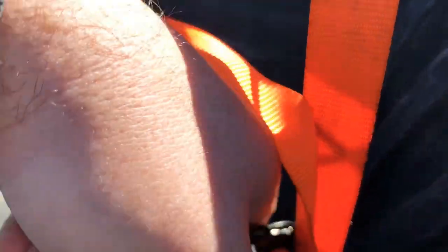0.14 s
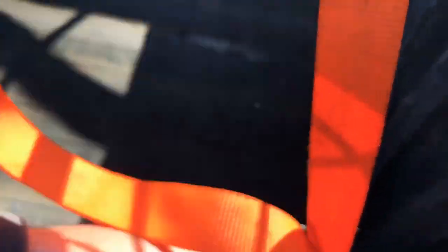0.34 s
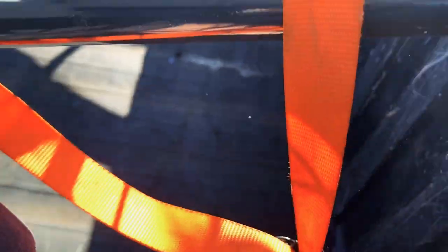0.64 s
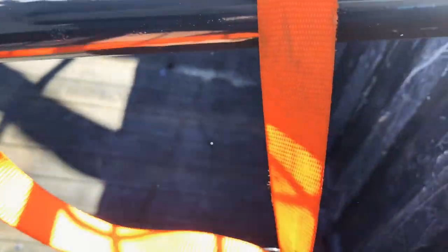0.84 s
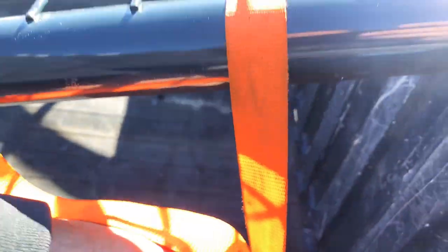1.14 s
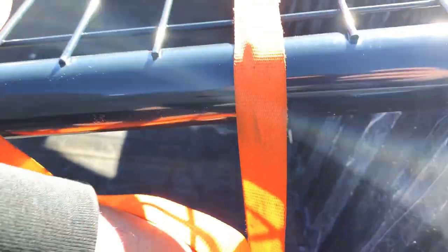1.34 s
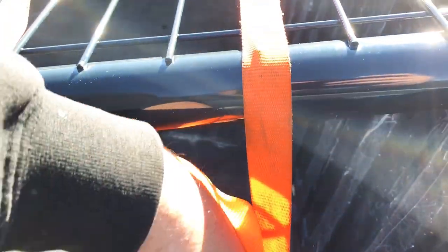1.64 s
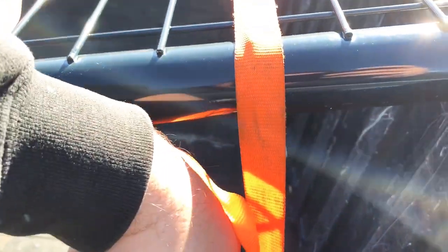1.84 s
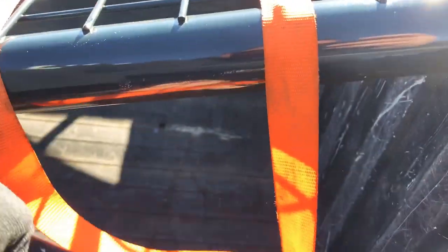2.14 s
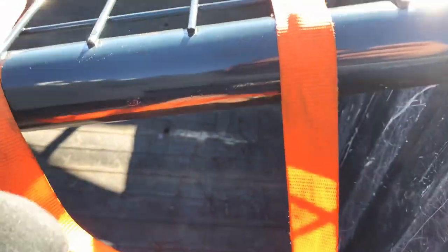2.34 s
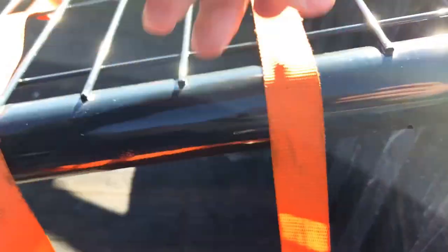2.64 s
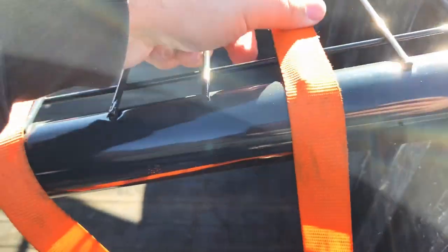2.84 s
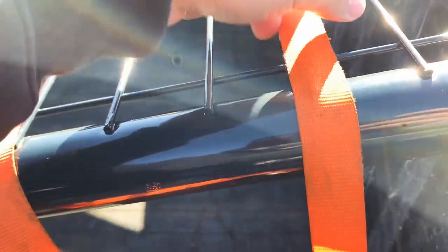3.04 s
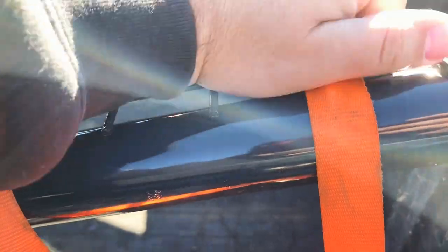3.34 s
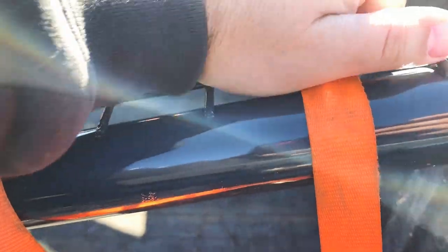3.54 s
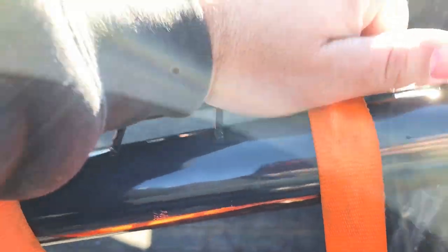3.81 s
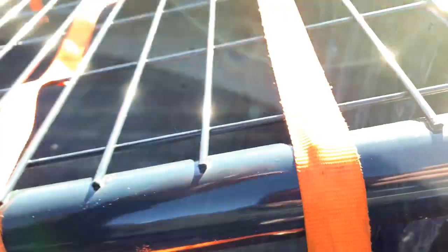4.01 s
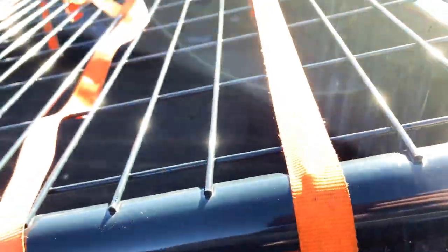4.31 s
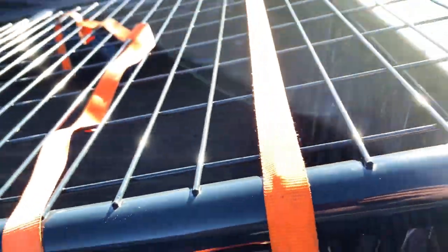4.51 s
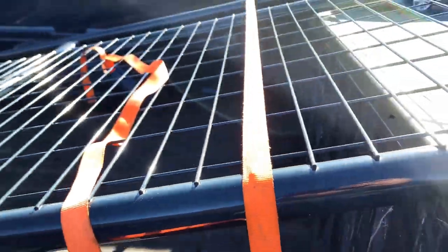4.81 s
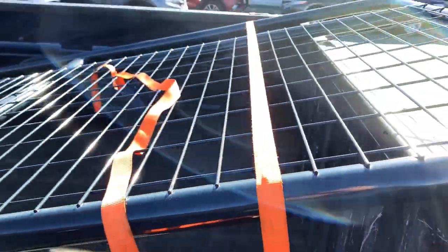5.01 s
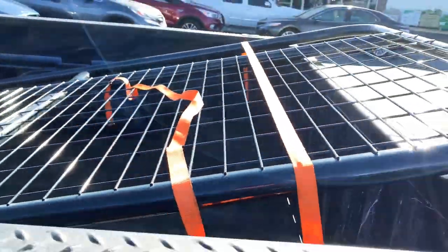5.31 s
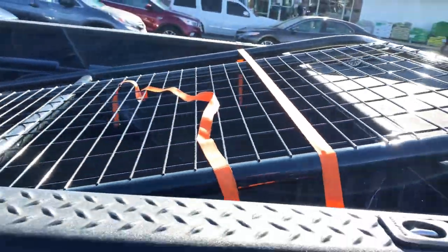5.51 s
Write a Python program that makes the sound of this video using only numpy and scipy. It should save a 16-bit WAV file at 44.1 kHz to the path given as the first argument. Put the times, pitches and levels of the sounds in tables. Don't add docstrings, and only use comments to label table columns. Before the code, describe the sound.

A strap ratchet snaps sharply, a steel gate rattles and thumps in a truck bed, cloth rubs, and an engine roars up then falls.

```python
import sys
import numpy as np
from scipy import signal
from scipy.fft import rfft, irfft, next_fast_len
from scipy.io import wavfile
from scipy.ndimage import uniform_filter1d

SR = 44100
rng = np.random.default_rng(int(sys.argv[2]) if len(sys.argv) > 2 else 0)


def decibels_to_gain(level_db):
    exponent = np.asarray(level_db, float) / 20
    return 10 ** exponent


def inscribe(sig):
    pcm = np.round(np.clip(np.atleast_2d(sig).T, -1, 1) * 32767)
    wavfile.write(sys.argv[1], SR, pcm.astype(np.int16))


N = 249606

# (time [s], level [dB])
SHAKE = [
    (0.93, -50.5),
    (0.955, -31),
    (1.08, -41.5),
    (1.125, -36),
    (1.185, -39),
    (1.23, -32.5),
    (1.69, -33.5),
    (1.79, -41.5),
    (1.95, -48.5),
]


def rms_one(x):
    return x / np.sqrt(np.mean(x ** 2) + 1e-20)


def in_time(rows):
    s, *columns = np.transpose(rows)
    return [np.interp(np.arange(N) / SR, s, c) for c in columns]


def at_hz(points, hz):
    return np.interp(np.log(hz), np.log(np.array(points)[:, 0]), np.array(points)[:, 1])


def during(rows):
    start, end = rows[0][0], rows[-1][0]
    return np.interp(np.arange(N) / SR, [start - .01, start, end, end + .04], [0, 1, 1, 0])


def drift(rate):
    r = np.exp(-80 * np.pi * rate / SR)
    slow = signal.lfilter([1], [1, -2 * r, r * r], rng.standard_normal(N // 40 + 2002))[2000:]
    return np.interp(np.arange(N) / 40, np.arange(len(slow)), rms_one(slow))


def ring(force, modes):
    out = 0
    for k, (hz, level_db, t60) in enumerate(modes):
        r = decibels_to_gain(-60 / (t60 * SR))
        w = 2 * np.pi * hz / SR
        mode = signal.lfilter([0, np.sin(w)], [1, -2 * r * np.cos(w), r * r], force + 1e-18)
        out = out + (-1) ** k * decibels_to_gain(level_db) * mode
    return out


def resonate(x, peaks):
    out = 0
    for hz, width, level_db in peaks:
        r = np.exp(-np.pi * width / SR)
        top = np.array([1, 0, -1]) * (1 - r * r) / 2
        bottom = [1, -2 * r * np.cos(2 * np.pi * hz / SR), r * r]
        out = out + decibels_to_gain(level_db) * signal.lfilter(top, bottom, x)
    return out


def colour(x, spectrum):
    log_gain = at_hz(spectrum, np.arange(1, 1026) * SR / 2050) * np.log(10) / 20
    cepstrum = irfft(log_gain)
    cepstrum[1:1024] *= 2
    response = irfft(np.exp(rfft(cepstrum[:1025], 2048)))[:600]
    return signal.fftconvolve(x, response)[:N]


def grains(per_s, spread_db):
    size = decibels_to_gain(spread_db * np.minimum(rng.exponential(1, N), 4)) * rng.choice([-1, 1], N)
    return rms_one(size * (rng.random(N) < per_s / SR))


def strikes(times, level_db):
    out = np.zeros(N)
    out[(np.asarray(times) * SR).astype(int)] = decibels_to_gain(level_db)
    return out


def ports(x, phase, scatter_db):
    # (frequency [Hz], left over right [dB])
    shadow = [(300, 1.2), (1500, -0.8), (3300, -2.5), (4300, -8), (5700, -7), (6600, -2), (7600, 4),
              (8800, 0.3), (10500, 1.5), (13400, 0)]
    size = next_fast_len(N + 2048)
    hz = np.arange(size // 2 + 1) * SR / size
    lead = 1j * np.interp(hz, *np.transpose(phase)) / 2 + at_hz(shadow, hz + 1) * np.log(10) / 40
    walls = rng.standard_normal((2, 900)) * np.exp(-np.arange(900) / (0.009 * SR))
    walls = rfft(walls / np.linalg.norm(walls[0]), size)
    walls = walls / (1 + (hz / 5800) ** 8) / (1 + (400 / (hz + 1)) ** 2)
    shifting = rfft(x * np.tanh(2 * drift(8.3)), size)
    direct = rfft(x, size) * np.exp(lead * [[1], [-1]])
    return irfft(direct + decibels_to_gain(scatter_db) * shifting * walls, size)[:, :N]


def traffic():
    # (frequency [Hz], density [dB per Hz])
    roar_spectrum = [(15, -10.5), (25, -7), (65, -1.5), (115, -5.5), (140, -13), (175, -7), (247, -17.5),
                     (357, -20), (543, -29.5), (767, -28.5), (1450, -38), (1820, -48), (9000, -65),
                     (11700, -94), (19800, -120)]
    # (time [s], level [dB])
    rumble = [(0.0, -23.5), (0.33, -32.5), (0.92, -28.5), (1.15, -24.5), (1.32, -31), (1.52, -24),
              (1.77, -30), (2.63, -30.5), (2.92, -28), (3.4, -31.5), (4.05, -28.5), (4.3, -29.5)]
    # (frequency [Hz], likeness [-1 to 1])
    likeness = [(60, 0.82), (130, 0.91), (290, 0.89), (640, 0.26), (1410, -0.36), (3100, -0.02),
                (6820, 0.61), (15000, 0.94)]
    out = 0
    together = drift(1.0)
    edges = 22 * 2 ** np.arange(0, 9, 1 / 3)
    white = rng.standard_normal((2, 2, N))
    for k, (low, high) in enumerate(zip(edges, edges[1:])):
        band = signal.butter(2, [low, high], "band", fs=SR, output="sos")
        mid, side = signal.sosfilt(band, white[k % 2])
        hz = np.sqrt(low * high)
        alike = np.clip(at_hz(likeness, hz), -.95, .95)
        gain = decibels_to_gain(at_hz(roar_spectrum, hz) + 1.4 * together + 2.54 * drift(17.0))
        out = out + gain * (np.sqrt(1 + alike) * mid + np.sqrt(1 - alike) * side * [[1], [-1]])
    return decibels_to_gain(in_time(rumble)[0] - 2.0) * rms_one(out) * decibels_to_gain(np.array([[.2], [-.2]]))


def strokes(rows):
    grip_share, let_go_share, edge_s = 0.092, 0.85, 0.0054
    t = np.arange(N) / SR
    power = np.zeros((2, N))
    for s, length, *level_db in rows:
        swell = np.minimum((t - s) / (grip_share * length + edge_s) - 1, 0)
        fade = np.minimum((s + length - t) / (let_go_share * length + edge_s), 0)
        shape = decibels_to_gain(40 * np.maximum(swell + fade, -5))
        power += decibels_to_gain(2 * np.array(level_db))[:, None] * shape
    return np.sqrt(power)


def rustle(rows, per_s, patchy_db, top, low):
    body_patch_db = 1.3
    bright, body = strokes(rows)
    bright = bright * decibels_to_gain(4.0 + patchy_db * drift(25)) * rms_one(colour(grains(per_s, 2.8), top))
    body = body * decibels_to_gain(3.0 + body_patch_db * drift(6.0)) * rms_one(colour(grains(per_s, 0.53), low))
    return bright + body


def webbing_and_fingers():
    # (start [s], length [s], bright level [dB], body level [dB])
    webbing = [(0.0, 0.17, -71, -55), (.15, 0.22, -68.5, -52), (.3, 0.037, -64.5, -56.5),
               (.42, 0.23, -86, -57), (.7, 0.12, -74, -49.5), (.715, 0.0081, -76, -41.5),
               (.84, 0.28, -71, -68), (.943, 0.0077, -66, -37), (.96, 0.12, -58, -46.5),
               (1.105, 0.046, -63, -42.5), (1.215, 0.076, -58, -43), (1.3, 0.048, -61, -51.5),
               (1.41, 0.059, -54.5, -46), (1.48, 0.1, -61.5, -49), (1.625, 0.044, -59.5, -51),
               (1.7, 0.29, -82, -57.5), (2.0, 0.14, -63, -49.5), (2.2, 0.21, -73.5, -62.5),
               (2.4, 0.16, -72, -65.5)]
    # (start [s], length [s], bright level [dB], body level [dB])
    fingers = [(2.69, 0.045, -45.5, -80), (2.79, 0.042, -54, -57), (2.865, 0.027, -58.5, -61),
               (2.952, 0.01, -72, -68), (3.015, 0.024, -51, -57), (3.065, 0.044, -54.5, -52.5),
               (3.13, 0.041, -60, -58.5), (3.193, 0.028, -61, -54), (3.27, 0.041, -71, -57.5),
               (3.33, .06, -85, -62), (3.4, 0.054, -83, -58.5), (3.455, 0.035, -75, -57),
               (3.5, 0.23, -73, -76)]
    # (frequency [Hz], density [dB per Hz])
    bright_band = [(4500, -3), (6500, 1.5), (10000, 7), (12500, 3), (15000, 3.5), (16300, -7)]
    # (frequency [Hz], density [dB per Hz])
    body_band = [(900, 9), (1800, 1.5), (2700, -1), (3500, 0), (4500, -0.5), (6000, -5.5), (8000, -24)]
    pulled = rustle(webbing, 11000, 5.3, bright_band, body_band)
    return pulled + rustle(fingers, 12000, 0.72, bright_band, body_band)


def blurred_rings(groups):
    out = np.zeros(N + SR)
    for (hz, width, t60), hits in groups:
        t = np.arange(int(min(1.5 * t60 + .02, 1) * SR)) / SR
        for (at, level_db), noise in zip(hits, rng.standard_normal((len(hits), SR))):
            narrow = resonate(noise[:len(t)], [(hz, width, 0)])
            band = rms_one(resonate(narrow, [(hz, min(4 * width, hz), 0)]))
            out[int(at * SR):][:len(t)] += band * decibels_to_gain(level_db - 60 * t / t60) * np.minimum(t / .0015, 1)
    return out[:N]


def near_rings():
    # ((frequency [Hz], width [Hz], t60 [s]), [(time [s], level [dB])])
    beside = [
        ((6140, 780, 0.74), [(0.0, -56.5), (.273, -44), (.331, -70.5), (2.138, -51.5)]),
        ((7000, 300, 0.42), [(2.07, -40), (2.136, -43)]),
        ((7300, 320, 0.023), [(1.889, -17), (1.8905, -18.5), (1.906, -35)]),
        ((4600, 720, 0.018), [(.234, -29.5), (.724, -16), (.954, -41)]),
        ((2700, 630, 0.013), [(.269, -22.5), (.724, -21), (2.07, -45.5), (2.136, -44.5)]),
        ((2070, 670, 0.17), [(4.06, -43), (4.191, -44.5), (4.524, -51)]),
        ((420, 1600, 0.016), [(.42, -37.5), (2.696, -31.5)]),
        ((1070, 94, 0.99), [(1.93, -44.5), (2.072, -44), (2.139, -54.5)]),
        ((390, 2700, 0.079), [(0.0, -33.5), (.269, -30.5), (.332, -34), (.728, -50)]),
        ((490, 28, 1), [(.334, -42.5)]),
    ]
    return blurred_rings(beside)


def ahead_rings():
    # ((frequency [Hz], width [Hz], t60 [s]), [(time [s], level [dB])])
    ahead = [
        ((3000, 290, 0.01), [(.7245, -19), (0.21, -32), (1.376, -32), (0.89, -38)]),
        ((3900, 900, 0.014), [(.2345, -31.5), (1.398, -34), (2.0295, -40)]),
        ((800, 150, 0.032), [(.7255, -45), (.955, -27)]),
        ((2600, 560, 0.12), [(4.0, -54), (4.195, -54), (4.29, -47), (4.32, -44.5), (4.52, -41.5), (4.938, -47)]),
        ((2930, 290, 2.1), [(4.62, -71), (5.2, -55), (5.33, -60), (5.55, -60)]),
        ((1760, 500, 0.24), [(3.2, -56), (3.24, -56), (3.275, -54.5), (3.34, -58), (3.38, -58), (3.42, -53.5), (3.46, -55)]),
        ((1110, 130, 0.52), [(1.99, -45.5), (2.08, -46.5), (2.15, -46.5), (2.2, -49), (2.28, -50.5)]),
        ((760, 1100, 0.055), [(4.466, -40), (5.237, -40.5), (5.342, -38), (5.617, -41.5)]),
        ((1000, 930, 0.83), [(0.0, -50.5), (.09, -52), (.18, -54)]),
             ((2000, 410, 0.017), [(.179, -44), (.2345, -36), (.27, -33), (.9535, -35), (1.376, -28), (1.891, -35), (2.069, -42), (2.695, -35)]),
        ((1090, 500, 0.037), [(.27, -30), (.3315, -30.5), (.4215, -46), (.7265, -36), (2.6955, -36.5)]),
        ((2480, 64, 0.074), [(2.07, -37), (2.137, -44)]),
        ((2500, 140, 0.59), [(3.99, -55.5), (4.04, -55)]),
        ((177, 27, 0.41), [(5.225, -24), (5.255, -36)]),
    ]
    return blurred_rings(ahead)


def gate():
    # (time [s], peak level [dB])
    knocks = [(.003, -27.5), (0.031, -32), (.058, -34.5), (.12, -31), (0.983, -15.5), (1.013, -17.5),
              (1.025, -33), (1.051, -15), (1.078, -21), (1.109, -16), (1.216, -15.5), (1.258, -18.5),
              (1.295, -27), (1.338, -37), (1.365, -16), (1.447, -17.5), (1.489, -15.5), (1.511, -23),
              (1.557, -16.5), (1.567, -21.5), (1.6, -44), (1.626, -14), (1.659, -28), (1.698, -34),
              (1.716, -41), (1.75, -29), (1.781, -29.5)]
    # (frequency [Hz], level [dB], t60 [s])
    gate_modes = [(781, 0.5, 0.036), (831, -5, 0.2), (897, -6.5, 0.039), (1020, -0.5, 0.014),
                  (1139, 5, 0.032), (1345, -16.5, 0.19), (1450, -21, 0.022), (1737, -19.5, 0.3),
                  (1990, -14, 0.098), (2440, -3.5, 0.0073), (2500, -17, 0.037), (3850, -17.5, 0.034),
                  (4020, -22, 0.068), (590, -6, 0.017),
                  (809, -17, 0.093), (1147, -4, 0.1), (1380, -26, 0.041), (1460, -20, 0.087),
                  (1760, -26.5, 0.08), (1860, -21, 0.043), (2060, -16, 0.032), (1640, -25, 0.031),
                  (1220, -11, 0.032), (941, -9, 0.04), (720, -23, 0.019), (577, -13.5, 0.046)]
    # (frequency [Hz], level [dB], t60 [s])
    bed_modes = [(95, -15, 0.03), (139.5, 7.5, 0.1), (187, 11.5, 0.066), (240.8, 7, 0.24),
                 (301, 6.5, 0.088), (373, 9, 0.096), (426, 12.5, 0.042), (497, -2, 0.14)]
    # (time [s], peak level [dB], frequency [Hz])
    thumps = [
        (0.047, -21, 69.6),
        (0.149, -40, 66.6),
        (0.502, -11.5, 79),
        (0.928, -9, 97),
        (1.468, -6, 57.3),
        (2.648, -13, 77.6),
        (3.568, -14, 62.3),
    ]
    bed_lead_db, bed_lag_s, knock_rise_s = 2.5, 0.016, .003
    tube_db, = in_time(SHAKE)
    lag = int(bed_lag_s * SR)
    bed_db = bed_lead_db + np.roll(uniform_filter1d(tube_db, int(2 * bed_lag_s * SR)), lag)

    s, knock_db = np.transpose(knocks)
    push = uniform_filter1d(strikes(s + knock_rise_s / 2, knock_db - 31.0), int(knock_rise_s * SR))
    rebound = signal.lfilter([1], [1, -np.exp(-1 / (0.0071 * SR))], push)
    bounce = rebound * rng.standard_normal(N) + strikes(s, knock_db - 20.0)

    chatter = during(SHAKE) * decibels_to_gain(tube_db - 30.5) * grains(1500, 4.2)
    tube = ring(chatter + bounce, gate_modes)
    rattle = during(SHAKE) * decibels_to_gain(bed_db - 1.0) * rms_one(ring(grains(450, 2.5), bed_modes))
    bed = rattle + decibels_to_gain(-13.5) * ring(bounce, bed_modes)
    thud = 0
    for at, level_db, hz in thumps:
        soft_blow = uniform_filter1d(strikes([at + 0.0039], level_db - 6.0), size=150)
        thud = thud + ring(soft_blow, [(hz, 0, .12)])
    return tube + bed + thud


def ratchet():
    # (time [s], peak level [dB], plate level [dB], handle level [dB], chatter length [ms])
    blows = [(0.2689, -12, -41, -23, 1.2), (0.2716, -6.5, -59, -40, 1.1), (0.3295, -5.5, -30, -22.5, 1.9),
             (0.7245, -11.5, -39, -22.5, 1.6), (0.952, -10.5, -21.5, -17, 1.1), (1.043, -47, -29, -50, 1.1),
             (1.3746, -6, -31, -16.5, 0.49), (1.3975, -11, -31.5, -18, 2), (1.8884, -22, -49, -30, 1.2),
             (1.892, -19, -45, -39, 1.2), (1.904, -21.5, -49, -50.5, 1.83), (1.917, -21, -46, -46, 1.2),
             (2.028, -35, -36, -39, 2.3), (2.0677, -4.5, -18.5, -44, 1.6), (2.1325, -13, -52, -24, 3.2),
             (2.1349, -10, -19.5, -28.5, 1.9)]
    # (time [s], peak level [dB], chatter length
    # [ms])
    further_clicks = [(0.1787, -30.5, 2.1), (0.194, -45, 1), (0.235, -29.5, 0.4), (0.257, -34, 5.5),
                      (0.266, -32.5, 3), (0.331, -36, 1.2), (0.2741, -22.5, 0.72), (0.3243, -40, 2),
                      (0.9548, -17, 0.8), (0.954, -26, 1.6), (1.108, -38, 4), (1.217, -38.5, 3),
                      (1.251, -45, 3), (1.557, -44, 3), (1.8861, -31.5, 1.5), (1.901, -31, 1.5),
                      (1.926, -29, 0.92), (1.955, -38, 2), (2.066, -36.5, 2.3), (2.0716, -19.5, 2),
                      (0.4215, -25, 0.95), (0.803, -35, 2), (0.811, -33.5, 2.3), (0.828, -40, 1.8),
                      (1.2936, -27, 5.2), (1.626, -34.5, 5.1), (1.8709, -36.5, 1.8), (1.862, -52, 4),
                      (1.963, -45, 3), (1.995, -43, 2.5), (2.056, -34.5, 6.2), (2.1461, -43, 1),
                      (2.696, -33, 2.2), (4.9385, -57, 2.9)]
    # (frequency [Hz], density [dB per Hz])
    crack_band = [(1500, -15), (3000, -11.5), (4500, -6.5), (7000, -1.5), (9500, 4.5), (12000, -2.5),
                  (14500, -0.5), (16000, -3)]
    # (frequency [Hz], level [dB], t60 [s])
    steel_modes = [(7530, -25.5, 0.07), (7500, -31.5, 0.11), (7750, -39.5, 0.013), (9100, -42, .08),
                   (10700, -63.5, .1), (11500, -29.5, .08), (11900, -30.5, 0.041), (14400, -43.5, .05)]
    # (frequency [Hz], level [dB], t60 [s])
    plate_modes = [(1024, 4.5, 0.028), (1130, 3.5, 0.071), (1195, -11.5, 0.059), (2460, 3, .03),
                   (1524, -13, 0.016), (1088, -7, .05), (826, -24.5, 0.027)]
    # (frequency [Hz], level [dB], t60 [s])
    handle_modes = [(1967, -3, 0.0077), (2340, -5.5, 0.011), (2048, -15, 0.0096), (1480, -20, 0.0063),
                    (2900, -7.5, 0.0055), (4040, 5, 0.0021), (464, -7.5, 0.081), (827, -9, 0.064)]
    tick_plate_db, tick_handle_db = -16, -5.5
    taut_s, held_ring_db, free_ring_db = 1.33, -17, -13
    peak_s = .005

    ticks = [(at, db, db + tick_plate_db, db + tick_handle_db, ms) for at, db, ms in further_clicks]
    s, crack_db, plate_db, handle_db, chatter_ms = np.transpose(blows + ticks)
    steel_db = np.where(s < taut_s, held_ring_db, free_ring_db)
    chatter, ringing = np.zeros(N), np.zeros(N)
    t = np.arange(round(.12 * SR)) / SR
    scrape = np.exp((t - peak_s) / 0.00028) + 0.012 * t / 0.0061
    tail = (t > peak_s) * (decibels_to_gain(-38.5) * np.exp(-t / 0.024) + decibels_to_gain(-30.5) * np.exp(-t / 0.026))
    for at, level_db, ms, ring_db in zip(s, crack_db, np.clip(chatter_ms, .5, 12), steel_db):
        drop = np.exp(-np.abs((t - peak_s) * 1200 / ms) ** 0.88)
        blow = decibels_to_gain(level_db) * np.where(t < peak_s, scrape, drop)
        start = int(at * SR) - 170
        chatter[start:][:len(t)] += blow + decibels_to_gain(level_db) * tail
        ringing[start:][:len(t)] += decibels_to_gain(ring_db) * blow
    contact = grains(20000, 3.6)
    crack = decibels_to_gain(3.0) * colour(chatter * contact, crack_band) + ring(ringing * contact, steel_modes)
    plate = ring(uniform_filter1d(strikes(s + 0.00245, plate_db), size=15), plate_modes)
    handle = ring(strikes(s, handle_db - 0.5), handle_modes)
    return crack + plate + handle


def rasp():
    # (frequency [Hz], density [dB per Hz])
    rasp_band = [(350, -5), (700, -0.5), (1200, 1), (1600, -8.5), (2200, -5), (3000, -19.5), (4200, -16.5),
                 (7000, -59)]
    level_db = uniform_filter1d(in_time(SHAKE)[0], size=900) - 8.5 + 1.5 * drift(32.0)
    return during(SHAKE) * decibels_to_gain(level_db) * rms_one(colour(grains(5000, 2.5), rasp_band))


def sleeve():
    # (start [s], length [s], bright level [dB], body level [dB])
    brushes = [(3.8, 0.059, -54, -48), (3.87, 0.21, -71, -49.5), (4.04, 0.036, -79, -50.5),
               (4.175, 0.047, -76, -44.5), (4.268, 0.06, -56, -47), (4.4, 0.12, -57.5, -52.5),
               (4.6, 0.14, -54.5, -73), (4.67, .3, -52, -80), (4.97, 0.25, -64.5, -51.5),
               (4.1, 2, -78, -47.5), (5.645, 0.018, -72, -47.5)]
    # (frequency [Hz], density [dB per Hz])
    cloth_band = [(4500, -3), (6800, -1.5), (8200, 1), (10000, -1), (12500, -5), (15000, -6), (16300, -17)]
    # (frequency [Hz], density [dB per Hz])
    cuff_band = [(900, 12), (1800, 1.5), (2750, -1), (3400, -3.5), (4500, -6), (6800, -8.5), (8000, -35.5)]
    return rustle(brushes, 12000, 2.37, cloth_band, cuff_band)


def engine():
    # (time [s], shaft speed [Hz], exhaust level [dB])
    stab = [
        (4.36, 51.96, -52),
        (4.43, 55.7, -36),
        (4.465, 56.96, -29.5),
        (4.495, 57.9, -26.5),
        (4.52, 52.17, -38.5),
        (4.545, 44.87, -40),
    ]
    # (time [s], shaft speed [Hz], exhaust level [dB])
    rev = [
        (4.575, 42.44, -27.5),
        (4.63, 56.76, -27.5),
        (4.7, 66.6, -29.5),
        (4.8, 75.26, -28.5),
        (4.878, 80, -29.5),
        (5.0, 83.02, -34),
        (5.19, 78.06, -40),
        (5.398, 68, -42.5),
        (5.67, 55.3, -37.5),
    ]
    # (multiple of shaft speed, level [dB])
    orders = [(1, 1), (1.5, -6.5), (2, 2.5), (2.5, -9.5), (3, -4.5), (3.5, -23), (4, -4), (5, -9), (6, -9),
              (7, -4), (8, -12.5), (9, -24.5), (10, -14)]
    # (frequency [Hz], width [Hz], level [dB])
    alike_waves = [(80, 46, -2), (230, 33, -8.5), (320, 15.6, -4.5), (460, 42, -4), (612, 31, -6.5),
                   (750, 8.8, 2.5), (802, 46, -10), (553, 240, -13.5)]
    # (frequency [Hz], width [Hz], level [dB])
    across_waves = [(120, 14, -35), (171, 32, 5), (317, 120, -8.5), (510, 115, -1.5)]
    # (frequency [Hz], width [Hz], level [dB])
    drone_wave = [(135.3, 17.3, 6.8)]
    # (frequency [Hz], width [Hz], level [dB])
    boom_wave = [(180.8, 4.5, 15.5)]
    # (time [s], peak level [dB])
    pops = [
        (5.152, -21.5),
        (5.24, -32),
        (5.342, -18),
        (5.478, -22),
    ]
    # (frequency [Hz], level [dB], t60 [s])
    pop_modes = [(179.3, -0.5, 0.2), (127, -5, 0.17)]
    lift_s, close_s, opened, closed = 5.04, 0.35, 0.93, 0.076
    swing_s, swing_length_s = 4.8, 0.41
    burble_hz, burble_peak_s, burble_db = 7, 5.285, -0.5

    run = stab + rev
    shaft_hz, exhaust_db = in_time(run)
    throttle, = in_time([(lift_s, opened), (lift_s + close_s, closed)])
    drone_db, boom_db = in_time([(swing_s, 6, -4.5), (swing_s + swing_length_s, 5, 12)])
    throb = np.cos(2 * np.pi * burble_hz * (np.arange(N) / SR - burble_peak_s))
    boom_db = boom_db + burble_db * (1 - throttle) * throb

    start = int(stab[0][0] * SR) - 500
    turn = 2 * np.pi * np.cumsum(shaft_hz * (1 + 0.0032 * drift(10.7)))[start:] / SR
    shut = 1 - np.clip(throttle[start:], 0, 1)
    tones = 0
    for k, level_db in orders:
        waver_db = min(.2 * k * k, 4.5) * drift(5 + 4 * k)[start:]
        dulling_db = 3.5 * max(k - 3, 0) * shut
        tones = tones + decibels_to_gain(level_db - dulling_db + waver_db) * np.sin(k * turn + k * k)
    roar = rms_one(signal.lfilter([1], [1, -.9], rng.standard_normal(N - start)))
    roar = roar * (1 + 0.34 * np.cos(2 * turn))
    gas = np.pad(tones + decibels_to_gain(-4.5 - 3.5 * shut) * roar, (start, 0))
    exhaust = during(run) * decibels_to_gain(exhaust_db) * gas

    alike = resonate(exhaust, alike_waves) + decibels_to_gain(drone_db) * resonate(exhaust, drone_wave)
    alike = alike + decibels_to_gain(boom_db) * resonate(exhaust, boom_wave)
    alike = alike + ring(uniform_filter1d(strikes(*np.transpose(pops)), size=60), pop_modes)
    return alike * decibels_to_gain(np.array([[.8], [-.8]])) + resonate(exhaust, across_waves) * [[1], [-1]]


def scene():
    # (frequency [Hz], left lead [rad])
    near_ports = [(0, 0), (1600, 0), (2100, .9), (3100, 3), (4100, 4.4), (5200, 3.6), (6700, 5.8),
                  (7800, 4.2), (8800, 3.1), (10900, 0), (13400, -3.14), (16000, -6.3)]
    # (frequency [Hz], left lead [rad])
    far_ports = [(0, 0), (500, 1.7), (1600, 3.2), (2600, 5.8), (3600, 9.1), (5700, 16), (7200, 19.4),
                 (7800, 16.4), (8800, 15.5), (10900, 12.57), (13400, 9.43), (16000, 6.27)]
    near = ports(webbing_and_fingers() + near_rings() + gate() + ratchet(), near_ports, -1.0)
    around = traffic() + ports(sleeve(), far_ports, -0.12) + engine()
    grind = np.array([rasp(), rasp()])
    return near + around + ahead_rings() + 1.3 * grind + .15 * grind[::-1]


def low_pass(x):
    return signal.sosfilt(signal.butter(12, 16650, fs=SR, output="sos"), x)


def record(dry):
    dry = signal.sosfilt(signal.butter(6, 34, "high", fs=SR, output="sos"), dry)
    dry = 1.1 * np.tanh(dry / 1.1)
    mix = signal.sosfilt(signal.cheby2(10, 60, 16700, fs=SR, output="sos"), dry)
    return low_pass(mix)


dry = scene()
out = record(dry)
inscribe(out)
```